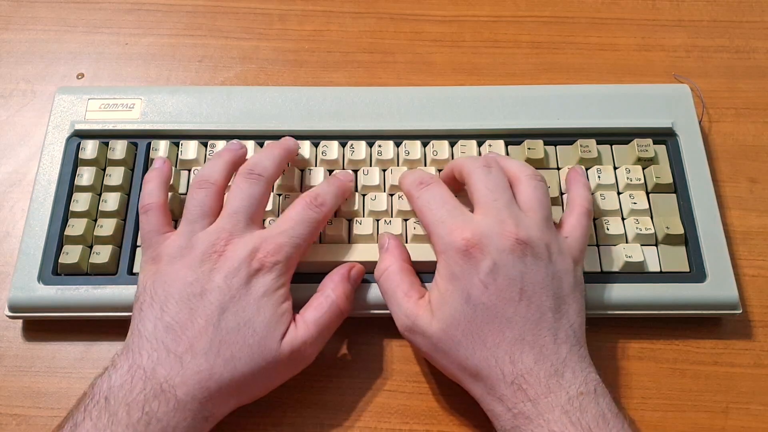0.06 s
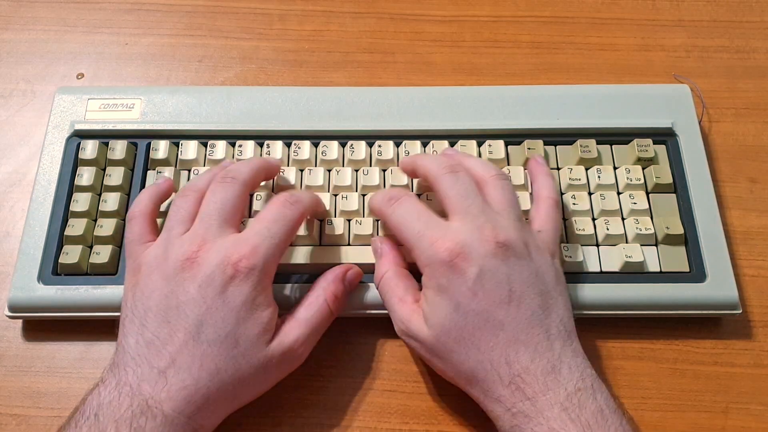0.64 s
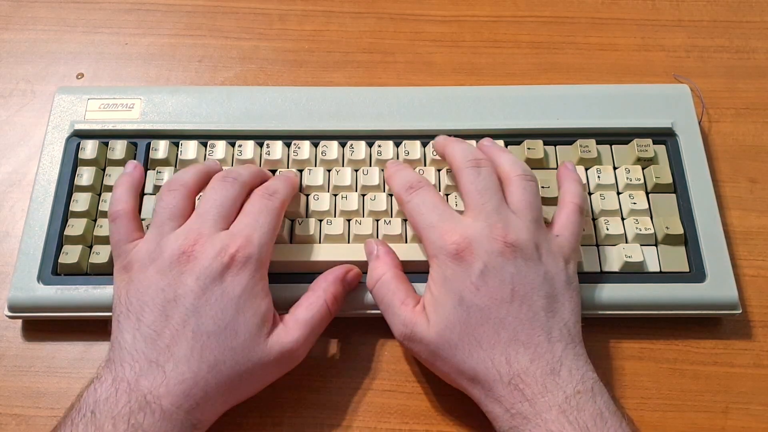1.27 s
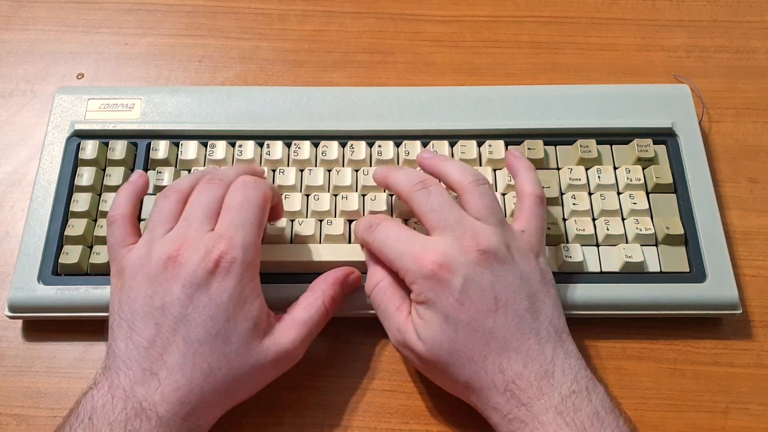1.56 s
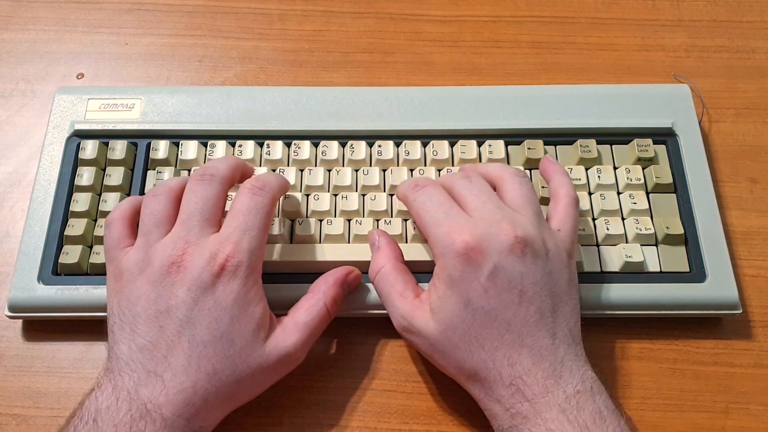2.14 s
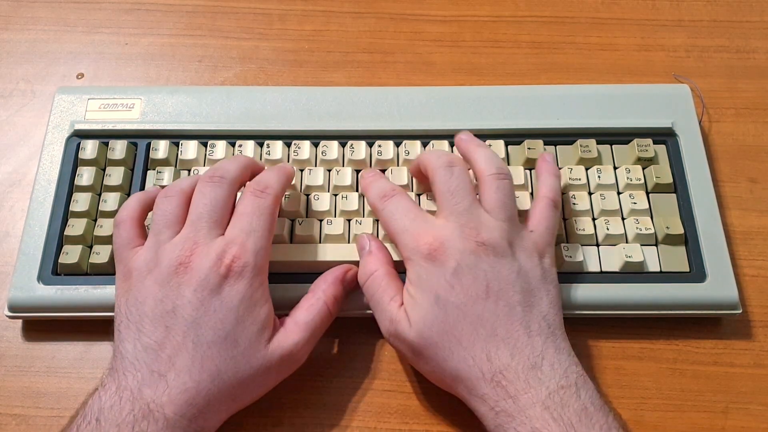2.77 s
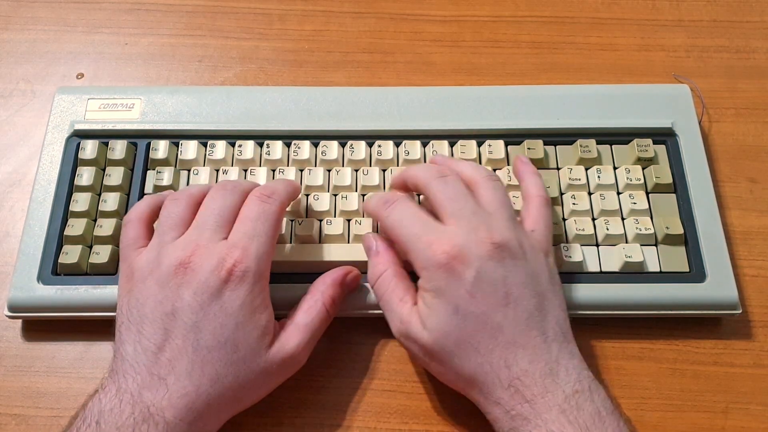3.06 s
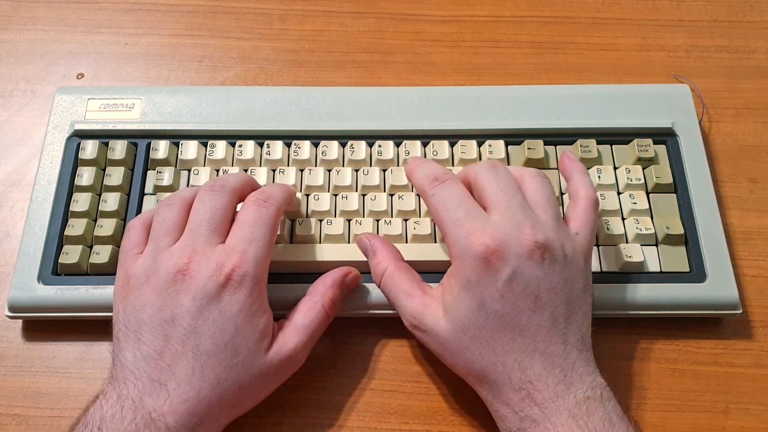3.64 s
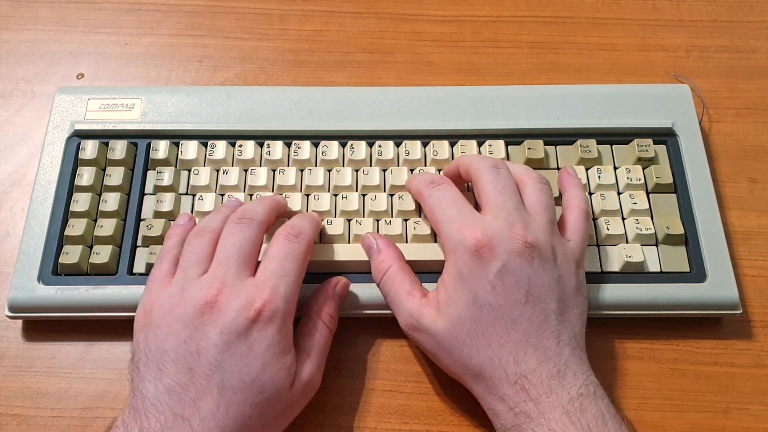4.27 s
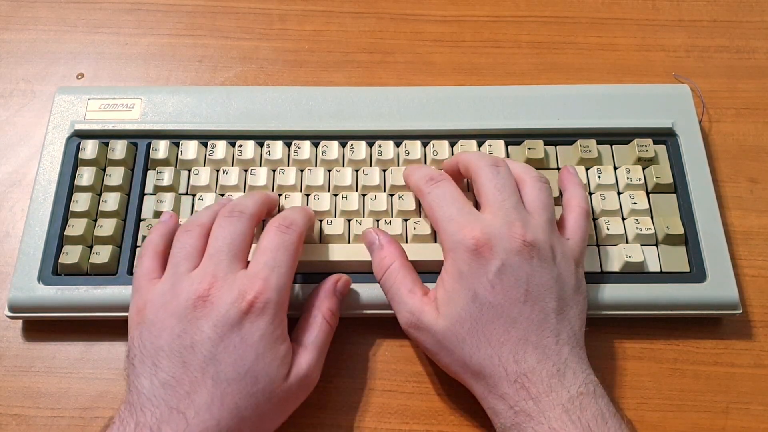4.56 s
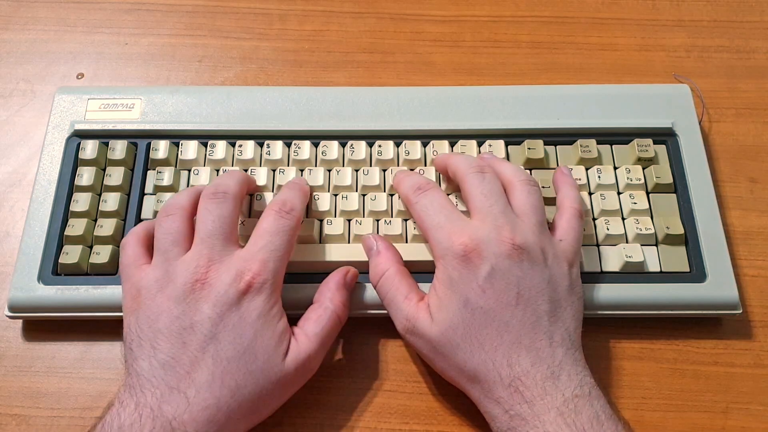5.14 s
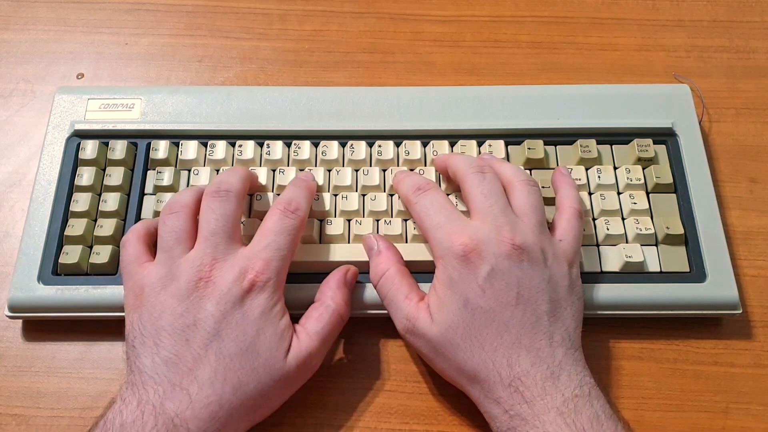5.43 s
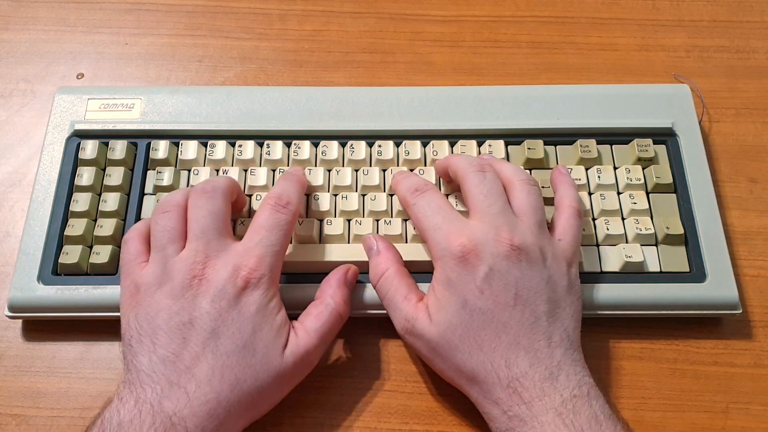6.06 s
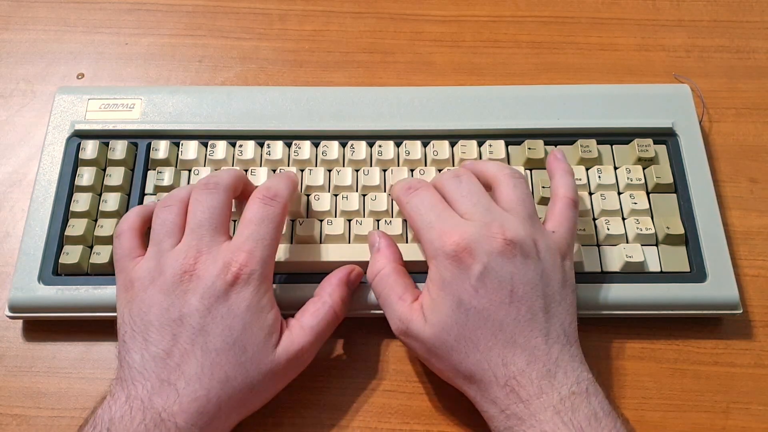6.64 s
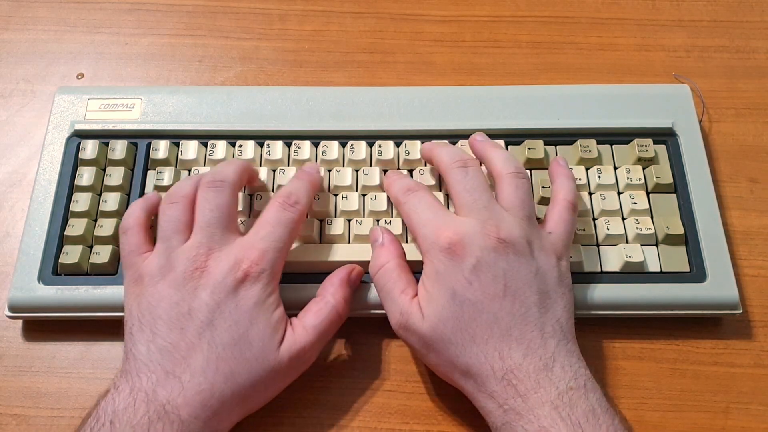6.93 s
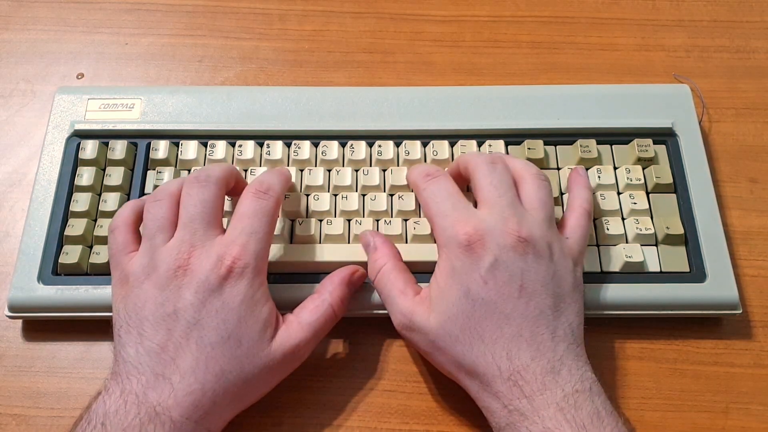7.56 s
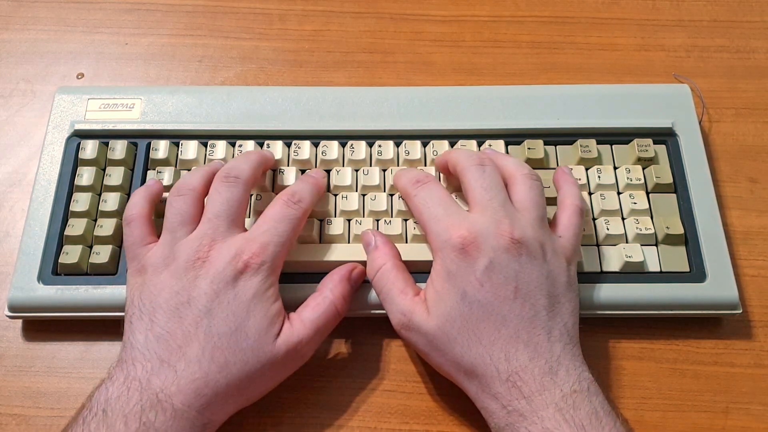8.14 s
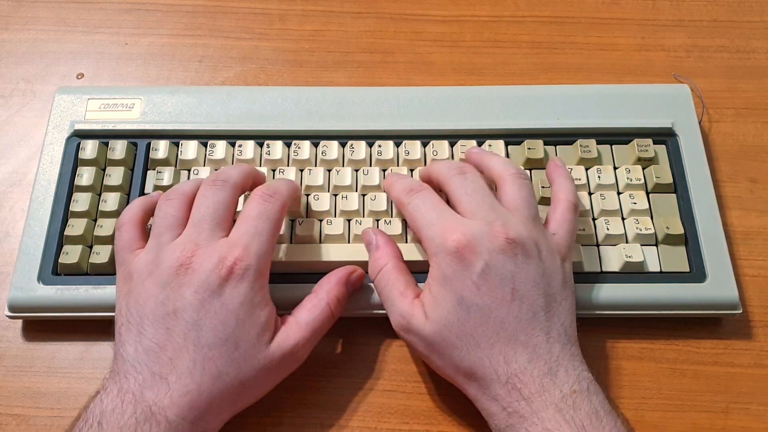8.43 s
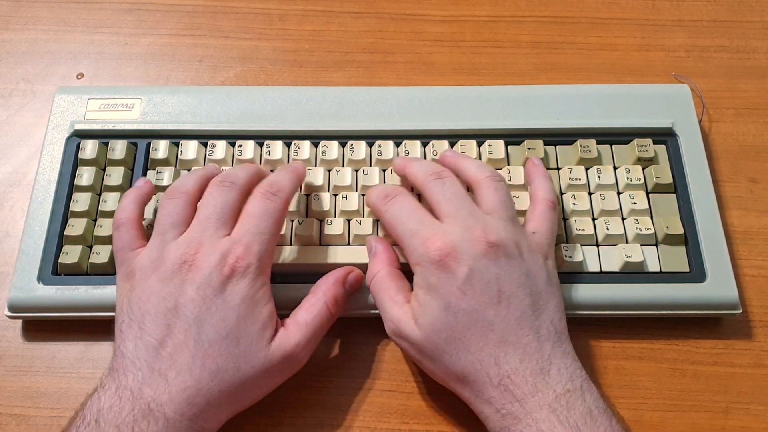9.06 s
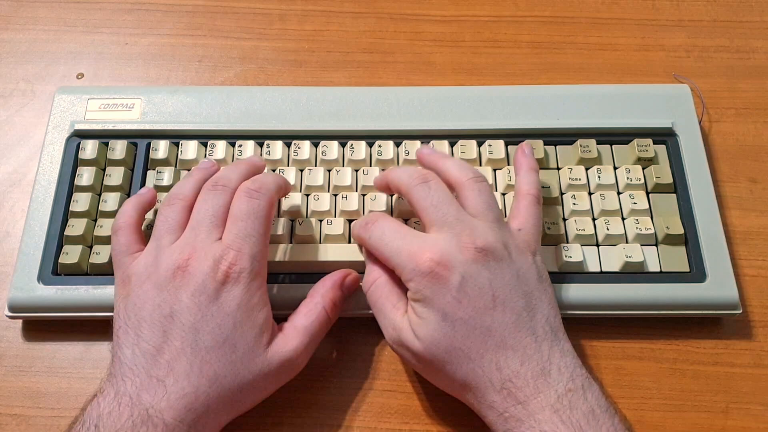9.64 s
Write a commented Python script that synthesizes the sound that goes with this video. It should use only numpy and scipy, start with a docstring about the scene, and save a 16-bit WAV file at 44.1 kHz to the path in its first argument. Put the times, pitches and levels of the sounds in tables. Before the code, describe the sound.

Someone types fast on a worn computer keyboard on a wooden desk. Sharp plastic clacks mix with soft finger taps and the rattle of loose keycaps, while the space bar adds a brief rasp and a dull thump. Midway the hands rest, leaving faint taps and a lone stroke, then the quick typing resumes. The microphone is close, in a small room with a faint low rumble.

```python
"""Fast typing on a worn computer keyboard on a wooden desk, heard from close by in a small room.
Over a low rumble come soft finger taps and faint key ticks; each key scrapes in its guide, strikes the
case and rebounds. Heavy strokes drive the desk's low modes, the released space bar rasps and hums, and
loose caps judder. From about 3.6 s the hands mostly rest, with faint taps and a few lone strokes;
at 6 s the typing resumes. The room answers the clacks with a short reverberation."""
import sys
import numpy as np
from scipy import signal
from scipy.fft import rfft, irfft, next_fast_len
from scipy.io import wavfile

SR = 44100
rng = np.random.default_rng(int(sys.argv[2]) if len(sys.argv) > 2 else 0)


def to_wav(sig):
    """Store sig (one row per channel, or 1-D mono) as 16-bit WAV at the path in sys.argv[1].

    Samples outside -1..1 are clipped; the rate is SR.
    """
    pcm = np.clip(np.atleast_2d(sig), -1, 1) * 32767
    pcm = np.round(pcm).astype(np.int16)
    wavfile.write(sys.argv[1], SR, pcm.T)  # frames by channels


N = 431738
TOP_HZ = 16100

# key contacts, down and up: t/s, level/dB, ring f/Hz, brightness/dB
KEY_CONTACTS = [(0.124, -38, 1043, -0.5), (0.1977, -36, 749, 3.5), (0.204, -43.5, 754, 5.5),
                (0.3549, -20.5, 785, 6.5), (0.6065, -38.5, 2020.0, 4), (0.6337, -27, 1380, -4.5),
                (0.7497, -41, 700, 4), (0.765, -40, 717, -6), (0.8546, -21, 690, 7.5),
                (0.9351, -34, 1110, -2.5), (1.0652, -30, 1400, 1.0), (1.1713, -34.5, 1920, 1),
                (1.3172, -32.5, 680, 2.5), (1.4442, -30.5, 840, -3.0), (1.5418, -39.5, 2130, 0.5),
                (1.5565, -35, 940, 0.5), (1.665, -37.0, 1130, 0), (1.689, -37.5, 870, -4.5),
                (1.7844, -26, 698, 0), (1.806, -31, 870, 5), (1.9208, -34.5, 1370, 3),
                (2.021, -38.0, 1386, -4.5), (2.037, -41.5, 1489, -10.5), (2.1505, -37, 687, -5.0),
                (2.3315, -30, 825, -1), (2.354, -35.5, 1466, -8.5), (2.6395, -32, 1510, 1),
                (2.6849, -42.5, 1271, 13.5), (2.6999, -34.0, 960, 6.5), (2.7589, -37.5, 850.0, 2.5),
                (2.8032, -29, 774, -10.5), (2.8933, -34, 795, -3.0), (2.9897, -31, 1470, -3.0),
                (3.1206, -42, 930, -5.5), (3.4671, -36, 2000, -8.5), (3.5732, -40, 855, 3),
                (4.634, -25.5, 680.0, -3), (5.1219, -43.5, 1350, -7), (6.0, -44.5, 1330, -1),
                (6.096, -43.5, 1360, -14), (6.1207, -37.0, 768, 2.5), (6.203, -37.5, 780, 0),
                (6.3355, -36.5, 1470, -9), (6.4384, -39, 785, 2), (6.4892, -33.5, 765, -7.5),
                (6.7173, -28.0, 812, -4.0), (7.0207, -33.5, 870, -1.5), (7.087, -39.0, 690.0, 3),
                (7.1058, -40.5, 870.0, -5.5), (7.137, -35.5, 2000, -5), (7.3714, -29.5, 760, -1.5),
                (7.4245, -28.0, 707, -0.5), (7.464, -35.5, 716, 5), (7.5234, -36, 690.0, 5.5),
                (7.7, -33.5, 880, 2.0), (7.777, -30.5, 1350.0, 2), (7.8248, -34, 645, 6.5),
                (8.2414, -29.5, 652, -7), (8.6014, -29, 1300, 2.0), (8.678, -25.5, 1420, -4.0),
                (8.7833, -36.5, 1470, 3.5), (8.9734, -33.5, 2070, 1.5), (9.0091, -39, 710, 6.5),
                (9.0826, -40, 920, -2.0), (9.1756, -41, 700.0, -3), (9.271, -34.5, 796, 1.5),
                (9.3106, -40.0, 710.0, 9), (9.4077, -29.5, 1020, -1.5), (9.45, -30.5, 980, 4.5),
                (9.5183, -27.5, 810.0, 1.5), (9.557, -33.5, 800, -1.5), (9.6115, -40, 1420, 5),
                (9.7362, -26.5, 794, -2.5), (9.7673, -23.5, 685, -5)]
# strokes of the space bar: press t/s, release t/s, return level/dB
SPACE_STROKES = [(0.615, 0.76, -33.5), (1.785, 1.906, -38.5), (2.325, 2.523, -40), (3.472, 3.574, -46.5),
                 (4.641, 4.777, -39), (6.72, 6.83, -39), (7.096, 7.219, -41), (7.422, 7.528, -34),
                 (8.251, 8.365, -40.5), (8.677, 8.793, -38), (9.029, 9.181, -42.5)]


def amp(db):
    """Amplitude ratio of a level: a factor of ten per 20 dB."""
    return 10 ** (np.asarray(db) / 20)


def along(points, hz):
    """Interpolation of (f/Hz, value) points on a logarithmic frequency axis."""
    f, value = np.transpose(points)
    return np.interp(np.log(hz + 1), np.log(f), value)


def filtered(x, response):
    """Linear filtering: the spectrum is multiplied by a frequency response."""
    n = x.shape[-1]
    padded = next_fast_len(n + 2048)
    return irfft(rfft(x, padded) * response(np.fft.rfftfreq(padded, 1 / SR)), padded)[..., :n]


def band(x, lo_hz, hi_hz, order=2):
    """Causal band-pass with a maximally flat passband."""
    sections = signal.butter(order, [lo_hz, min(hi_hz, TOP_HZ)], 'band', fs=SR, output='sos')
    return signal.sosfilt(sections, x)


def sized(x, db):
    """Energy scaling: each burst of (events, 2, samples) gets the energy of 10 ms at db."""
    energy = np.sum(x.mean(1) ** 2, -1) / (SR / 100)
    return x * (amp(db) / np.sqrt(energy + 1e-20))[:, None, None]


def fade(t, t60):
    """Exponential damping by 60 dB in t60 seconds, silent before t = 0."""
    return (t >= 0) * 1000.0 ** (-np.abs(t) / t60)


def placed(times, bursts):
    """Superposition of stereo bursts at their starting times."""
    out = np.zeros((2, N + 2 * SR))
    for start, burst in zip(times, bursts):
        out[:, SR + round(start * SR):][:, :burst.shape[-1]] += burst
    return out[:, SR:SR + N]


def stereo_noise(envelope, lag_ms=0.054):
    """Partly coherent noise under each envelope row; a path difference lets the left channel lead."""
    # stereo difference signal: f/Hz, level/dB relative to the mid signal
    side_levels = [(700, -13), (1300, -6.5), (4000, -6.5), (10000, -8.5)]
    mid, side = rng.standard_normal((2,) + envelope.shape)
    side = filtered(side, lambda hz: amp(along(side_levels, hz)))
    advance = rng.uniform(0, 2 * lag_ms, (len(envelope), 1, 1)) * np.array([[.5], [-.5]]) / 1000
    pair = np.stack([mid + side, mid - side], 1)
    pair = filtered(pair, lambda hz: np.exp(2j * np.pi * np.minimum(hz, 3300) * advance))
    return pair * envelope[:, None]


def resonance(hz, centre, width):
    """Response of a damped oscillator of given half-power width."""
    return 1j * hz * width / (centre ** 2 - hz ** 2 + 1j * hz * width)


def ringing(modes, t, count, rise_s):
    """Modal synthesis: damped sines swell and fade, with new strengths at each of count blows."""
    hz, db, t60 = np.transpose(modes)
    strength = amp(db + 2 * rng.standard_normal((count, len(hz))))
    phase = rng.uniform(0, 2 * np.pi, (count, len(hz), 1))
    waves = np.sin(2 * np.pi * hz[:, None] * t + phase) * fade(t, t60[:, None])
    ring = np.sum(strength[..., None] * waves, 1) * (1 - np.exp(-np.abs(t) / rise_s))
    return np.stack([ring, ring], 1)


def in_room(bursts, wet_db, build_s=0.0016):
    """Reverberation: each burst is convolved with its own tail of diffuse wall reflections."""
    # reverberation times: f/Hz, T60/s
    decay_times = [(400, 0.24), (2500, 0.19), (8000, 0.27), (15000, 0.21)]
    size = SR // 4
    hz, t, spectra = signal.stft(stereo_noise(np.ones((len(bursts), size))), SR, nperseg=128)
    spectra = spectra * fade(t, along(decay_times, hz)[:, None])
    tail = signal.istft(spectra, SR, nperseg=128)[1][..., :size]
    tail = tail * (1 - np.exp(-(np.arange(size) / SR / build_s) ** 2))
    tail *= amp(wet_db) / np.sqrt(np.mean(np.sum(tail ** 2, -1)))
    tail[..., 0] += 1  # direct sound
    return signal.fftconvolve(bursts, tail, axes=-1)


def room_rumble(level_db=-53, side_db=-14):
    """Stationary noise: the room's low rumble, with faint hiss."""
    # spectral density: f/Hz, relative level/dB
    spectrum = [(28, -29.5), (50, -2), (60, -7.5), (76, -7), (100, -5.5), (125, -14), (300, -24),
                (450, -34), (1500, -43), (6500, -54.5), (9500, -52.5), (12500, -42), (16000, -46.5)]
    mid, side = filtered(rng.standard_normal((2, N)), lambda hz: amp(along(spectrum, hz)))
    side = side * amp(side_db)
    return amp(level_db) * np.array([mid + side, mid - side]) / mid.std()


def taps(times, pitch_hz, db, ping_db=-1, ping_q=9, firm_db=-49.5):
    """Soft impacts excite a broad resonance and a narrow ping; lower ones are duller and longer."""
    t = np.arange(SR // 14) / SR
    press = fade(t, 0.058 * (1000 / pitch_hz[:, None]) ** .5)
    pitch = pitch_hz[:, None, None]
    cutoff = pitch * 8 * amp(db - firm_db)[:, None, None] ** .5  # a firmer contact passes more treble
    cap = lambda hz: resonance(hz, pitch, pitch) + amp(ping_db) * resonance(hz, pitch, pitch / ping_q)
    force = band(stereo_noise(press), 410, TOP_HZ)
    burst = filtered(force, lambda hz: cap(hz) / (1 + (hz / cutoff) ** 2))
    return placed(times, in_room(sized(burst, db), wet_db=0.5))


def taps_and_ticks():
    """Light impacts: soft finger taps and faint, bright key ticks."""
    # finger taps and weak key contacts: t/s, f/Hz, level/dB
    light_impacts = [(0.004, 907, -38.5), (0.435, 1070, -39.5), (0.487, 880, -42.5), (0.575, 1140, -37),
                     (0.723, 2760, -43.5), (1.302, 790, -38.5), (1.621, 6050, -42), (2.313, 705, -40),
                     (2.458, 990, -42.5), (2.617, 3360, -43.5), (3.203, 945, -44), (3.447, 3000, -44.5),
                     (4.111, 1390, -58.5), (4.463, 960, -56), (4.613, 700, -47), (4.753, 1410, -48),
                     (4.978, 1385, -61), (5.059, 930, -61), (5.897, 990, -61), (6.383, 1390, -41),
                     (6.562, 1970, -42.5), (6.581, 820, -39), (6.684, 3180, -44), (6.875, 3650, -42.5),
                     (6.918, 1270, -42), (7.309, 4170, -44.5), (7.813, 3520, -43.5), (8.056, 1976, -61),
                     (8.196, 4000, -47.5), (8.566, 6880, -43.5), (9.137, 820, -37.5), (9.247, 3340, -39.5),
                     (9.663, 1280, -40.5)]
    return taps(*np.transpose(light_impacts))


def impacts(t, rattle_s, t60, bounce_db=-10, scrape_db=-33, finger_db=-26, settle_db=-19, count=4):
    """Incoherent powers add to one envelope: stem scrape, finger landing, hit, bounces and settling."""
    shape = (len(rattle_s), count)
    scatter_db = lambda: 2.3 * rng.standard_normal(shape + (1,))

    def hits(db, delay, decay_s):
        return np.sum((amp(db + scatter_db()) * fade(t - delay[..., None], decay_s)) ** 2, 1)

    scrape = amp(scrape_db + scatter_db()[:, 0]) * fade(-t, .05)
    power = fade(t, t60) ** 2 + scrape ** 2
    power += hits(finger_db, -rng.uniform(0, 0.0094, shape), t60)
    # a looser cap bounces longer and harder
    bounce_s = rattle_s[:, None] * rng.uniform(0.22, 1.5, shape)
    power += hits(bounce_db + 250 * rattle_s[:, None, None], bounce_s, t60)
    power += hits(settle_db, rng.uniform(.004, 0.04, shape), t60 / 2)
    return np.sqrt(power)


def case_response(count, cap_db=3, cap_q=7):
    """Parallel resonators: the modes of the case, plus a bright one for each of count caps."""
    # resonances of case and caps: f/Hz, bandwidth/Hz, level/dB
    modes = [(731, 83, 4.5), (900, 210, 4.5), (1072, 44, -6.5), (1417, 97, 7), (2156, 230, 7.5),
             (2623, 210, 4), (3380, 120, -18.5), (6370, 1100, 0.5), (7990, 230, -19)]
    cap_hz = np.exp(rng.uniform(np.log(2400), np.log(10000), (count, 1, 1)))
    body = lambda hz: 1 + sum(amp(db) * resonance(hz, centre, width) for centre, width, db in modes)
    return lambda hz: body(hz) + amp(cap_db) * resonance(hz, cap_hz, cap_hz / cap_q)


def panned(bursts, spread_db=1.1):
    """A level difference between the channels sets each key a little to one side."""
    return bursts * amp(spread_db * rng.standard_normal((len(bursts), 1, 1)) * np.array([[.5], [-.5]]))


def key_clacks(lead_s=.015, ring_q=9):
    """Impact excitation: each contact shakes case and cap, and rings one spot of the plate."""
    times, db, ring_hz, bright_db = np.transpose(KEY_CONTACTS)
    t = np.arange(SR // 14) / SR - lead_s
    force_db = db - db.mean()
    rattle_s = 0.0018 * np.exp(-.05 * force_db)  # firm contacts seat sooner
    # bright strokes have less case and more cap; hard ones click more and snap less
    clack_db = db - 0.5 - 0.47 * bright_db
    click_db = db - 3 + 0.19 * bright_db + 0.15 * force_db
    snap_db = db - 5.5 + 0.7 * bright_db - 0.15 * force_db
    ring_db = db - 2.5 - 0.44 * bright_db + 1.5 * np.log2(ring_hz / ring_hz.mean())
    case = case_response(len(times))
    shell = lambda t60: filtered(stereo_noise(impacts(t, rattle_s, t60)), case)
    clack = sized(band(shell(t60=0.043), 571, 2000, order=4), clack_db)
    click = sized(band(shell(t60=0.04), 2000, 5130, order=3), click_db)
    treble = band(shell(t60=0.027), 4500, TOP_HZ, order=3)
    snap = sized(band(treble, 1600, 10500), snap_db)
    push = band(stereo_noise(impacts(t, rattle_s, t60=0.012)), 560, 3300, order=3)
    spot_hz = ring_hz[:, None, None]
    ring = sized(filtered(push, lambda hz: resonance(hz, spot_hz, spot_hz / ring_q)), ring_db)
    strokes = panned(clack + click + snap + ring)
    return placed(times - lead_s, in_room(strokes, wet_db=-5.5, build_s=0.0026))


def brushed_caps(level_db=-47, pitch_hz=1200):
    """Glancing impacts: between quick strokes the moving hand brushes a neighbouring cap."""
    key_times = np.transpose(KEY_CONTACTS)[0]
    gap_s = np.diff(key_times)
    times = (key_times[:-1] + gap_s * rng.uniform(.2, 1, len(gap_s)))[gap_s < .2]
    pitch = pitch_hz * np.exp(0.38 * rng.standard_normal(len(times)))
    return taps(times, pitch, level_db + 2 * rng.standard_normal(len(times)))


def heavy_strokes(press_db=-47, return_share_db=-11, key_share_db=-22.5, count=4):
    """Transmission to the desk: times and levels from the space bar, down and up, and the hardest keys."""
    down, up, return_db = np.transpose(SPACE_STROKES)
    key_times, key_db, _, bright_db = np.transpose(KEY_CONTACTS)
    hardest = np.sort(np.argsort(key_db)[-count:])
    weight_db = (key_db - 0.47 * bright_db)[hardest]
    levels = [np.full(len(down), press_db), return_db + return_share_db, weight_db + key_share_db]
    return np.concatenate([down, up, key_times[hardest]]), np.concatenate(levels)


def desk_thumps():
    """Structure-borne sound: the desk top takes up heavy strokes slowly and booms in its low modes."""
    # modes of the desk: f/Hz, relative level/dB, T60/s
    modes = [(52, -4, .4), (160, -.5, .32), (190, -3, .22), (232, -5, .22), (300, -10, .15),
             (372, -2.5, .2), (514, -5, .16)]
    times, db = heavy_strokes()
    t = np.arange(SR // 3) / SR
    boom = ringing(modes, t, count=len(times), rise_s=0.013)
    swell = fade(t, 0.97) * (1 - np.exp(-t / 0.0021))
    thud = band(stereo_noise(np.tile(swell, (len(times), 1))), 100, 480)
    return placed(times, sized(boom, db + 8.5) + sized(thud, db + 2.5))


def space_bar(lead_s=0.0069):
    """Friction and free vibration: the released bar rasps up its wire stabiliser and hums briefly."""
    # modes of the bar: f/Hz, relative level/dB, T60/s
    modes = [(688, 4, 0.15), (819, -3.5, 0.14), (1870, -11, 0.22)]
    _, times, db = np.transpose(SPACE_STROKES)
    t = np.arange(SR // 5) / SR - lead_s
    hum = sized(ringing(modes, t, count=len(times), rise_s=0.0052), db + 1.0)
    slide = impacts(t, rattle_s=np.full(len(times), .02), t60=0.042)
    rasp = sized(band(stereo_noise(slide), 700, 7000), db - 1)
    return placed(times - lead_s, hum) + placed(times - lead_s, in_room(rasp, wet_db=-4.5))


def cap_chatter(lead_s=0.014):
    """Repeated collisions: a cap pushed off centre judders down its guide, shaking the case."""
    # judders of loose caps: t/s, level/dB, bounce time/s
    judders = [(1.226, -36.5, 0.007), (1.378, -30.5, 0.011), (1.411, -35.5, 0.016), (1.7313, -32, 0.018),
               (2.335, -41, .02), (2.944, -38.5, 0.013), (6.1255, -31.5, 0.014), (7.6676, -35, 0.029)]
    times, db, rattle_s = np.transpose(judders)
    t = np.arange(SR // 12) / SR - lead_s
    judder = filtered(stereo_noise(impacts(t, rattle_s, t60=0.051)), case_response(len(times)))
    clack = sized(band(judder, 550, 1660, order=4), db - 3)
    zing = sized(band(judder, 2000, 11000), db - 2)
    return placed(times - lead_s, in_room(clack + zing, wet_db=-9))


def resting_fingers(span_s=(3.75, 4.5), level_db=-64, pitch_hz=1200, count=4):
    """Weak excitation at random times: in the pause the fingers shift on the caps."""
    times = rng.uniform(*span_s, count)
    pitch = pitch_hz * np.exp(0.2 * rng.standard_normal(count))
    return taps(times, pitch, level_db + 2 * rng.standard_normal(count))


def scene():
    """Superposition of all sources, with the keyboard slightly nearer the left microphone."""
    # level difference, left minus right: f/Hz, level/dB
    balance = [(500, 3.5), (1500, 2), (4500, 1), (6300, -2.5), (8000, 5), (12000, 1.5)]
    typing = key_clacks() + cap_chatter() + taps_and_ticks() + space_bar() + desk_thumps()
    typing = typing + resting_fingers() + brushed_caps()
    split = np.array([[.5], [-.5]])
    typing = filtered(typing, lambda hz: amp(split * along(balance, hz)))
    return typing + room_rumble() * amp(split * 1.6)


def record(dry):
    """Band limiting: an ideal low-pass removes everything above TOP_HZ."""
    return filtered(dry, lambda hz: hz < TOP_HZ)


dry = scene()
out = record(dry)
to_wav(out)
```